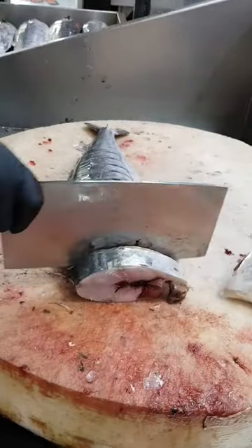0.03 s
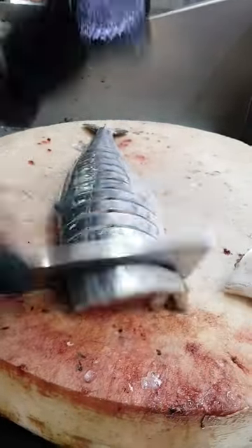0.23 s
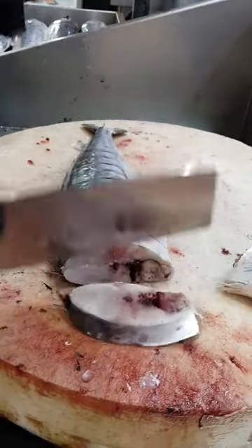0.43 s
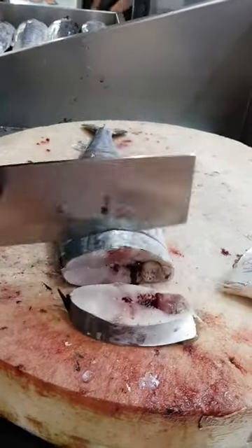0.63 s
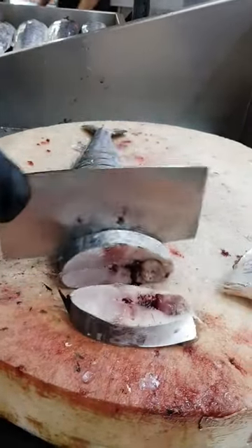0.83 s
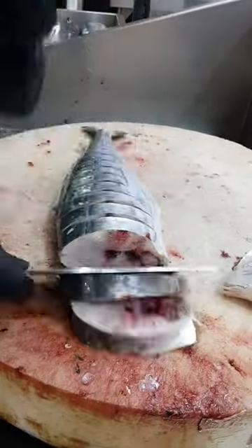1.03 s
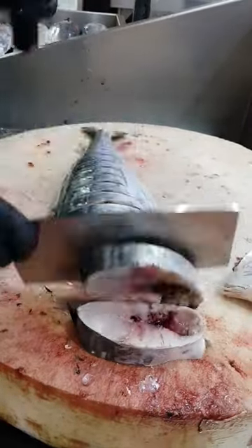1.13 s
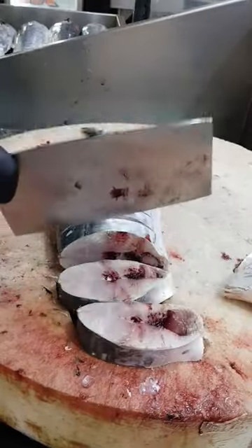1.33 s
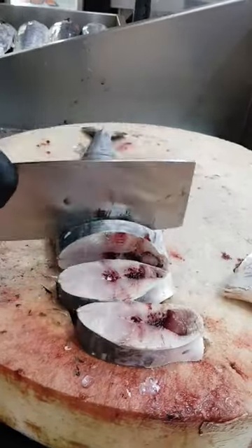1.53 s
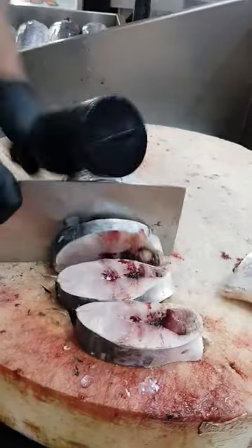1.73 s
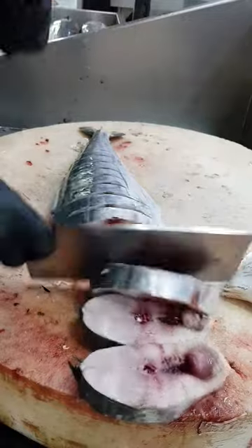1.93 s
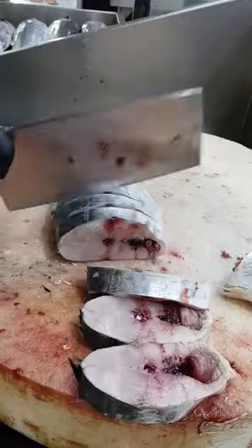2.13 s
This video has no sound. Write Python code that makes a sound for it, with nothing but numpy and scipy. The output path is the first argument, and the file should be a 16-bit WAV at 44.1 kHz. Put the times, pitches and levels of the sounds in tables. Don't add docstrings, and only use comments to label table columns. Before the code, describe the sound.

Close to a steel table in a humming hall, a mallet drives a cleaver through fish three times, woody and clanging, with deep thumps; slices slide softly between blows, and the right side is muffled.

```python
import sys
import numpy as np
from scipy import signal
from scipy.fft import rfft, irfft, next_fast_len
from scipy.io import wavfile
from scipy.ndimage import uniform_filter1d

SR = 44100
rng = np.random.default_rng(int(sys.argv[2]) if len(sys.argv) > 2 else 0)


def ratio(d):
    e = np.asarray(d, float) / 20
    return 10 ** e


def unload_audio(sound):
    columns = np.transpose(np.atleast_2d(sound))
    steps = np.round(np.clip(columns, -1, 1) * 32767)
    wavfile.write(sys.argv[1], SR, steps.astype(np.int16))


N = 97020

# pitch_hz, level_db (per Hz)
HALL_SPECTRUM = [(25, -13), (100, -5.5), (270, -11.5), (700, -14), (3800, -22.5), (6500, -35),
                 (11000, -29.5), (15400, -38.5)]
# pitch_hz, width_hz, level_db
HALL_HUMPS = [(108, 40, 10), (210.6, 37, 12)]
# time_s, level_db
HALL_ACTIVITY = [(0, 1.5), (.25, 4.5), (.45, -1), (.7, -1.5), (1.0, 1), (1.3, -1), (1.6, -0.5), (1.9, -1),
                 (2.2, 0)]
# pitch_hz, level_db
MOTOR_LINES = [(590, -77), (785, -105), (1174, -76), (1567, -80.5), (1760, -78.5), (2353, -83.5),
               (2552, -81.5)]
# pitch_hz, likeness (-1 to 1)
PORT_LIKENESS = [(60, 1), (180, 1), (550, 0.68), (1650, -0.038), (4970, -0.11), (15000, 0.12)]
# pitch_hz, level_db (per Hz)
WET_SPECTRUM = [(1500, -40), (3500, 5.5), (6500, -0.5), (10000, 5.5), (15000, -4.5)]
# start_s, length_s, level_db
RUSTLES = [
    (0.621, 0.38, -59),
    (1.121, 0.25, -54.5),
    (1.484, 0.11, -57),
    (1.548, 0.083, -53.5),
    (1.682, 0.14, -54.5),
    (1.851, 0.29, -54.5),
    (0.045, .15, -63),
]
# start_s, level_db, pitch_hz
TICKS = [
    (.111, -50, 11500),
    (.79, -54, 12000),
    (1.400, -38, 3750),
    (1.9, -53, 13000),
]
# mallet_s, blow_db, travel_to_wood_s, landing_db, touch_hiss_db
BLOWS = [
    (0.2467, -3, .0162, -5.5, -27.5),
    (.985, -1, .030, -7, -39),
    (1.8206, -1.5, .031, -11.5, -41.5),
]
# pitch_hz, level_db (per Hz)
KNOCK_SPECTRUM = [(150, -8), (400, -9.5), (1000, -10.5), (2000, -17.5), (4000, -28.5), (7000, -51.5),
                  (10000, -53), (15500, -62)]
# pitch_hz, t60_s
KNOCK_DECAY = [(200, 0.66), (500, 0.32), (1000, 0.29), (2000, 0.29), (4000, 0.2), (8000, 0.6),
               (15000, 0.24)]
# pitch_hz, level_db, t60_s
BLADE_MODES = [(890.7, -16.5, 0.42), (957, -38, 0.15), (1015.9, -1.5, 0.43), (1613, -13.5, 0.093),
               (1798, -28.5, .15), (2266, -31.5, 0.14), (2840, -37, 0.039), (3880, -39.5, 0.11)]
# pitch_hz, level_db (over the touch), t60_s
BONE_SNAP_MODES = [(2910, 9.5, 0.027), (1753, 11, 0.025), (4290, -3, 0.019), (5330, -6.5, 0.0067),
                   (9300, -9.5, 0.0099), (13500, -10, 0.016)]
# pitch_hz, level_db, t60_s
BLOCK_MODES = [(479, -19.5, 0.28), (531.7, -17, 0.32), (620.6, -21.5, 0.46), (668, -22, 0.28),
               (914, -30.5, 0.54), (1022, -24, 0.48), (1607, -24, 0.28), (1662, -32.5, 0.28),
               (1763, -36, 0.26), (2070, -33, 0.2), (2231, -28, 0.21), (3127, -35, 0.2), (4025, -43, 0.23)]
# pitch_hz, level_db, t60_s
TABLE_MODES = [(63.7, -4.5, 0.16), (78.8, -14.5, 0.26), (94.93, -1, 0.36), (100.9, -20.5, 0.86),
               (144.3, -5, 0.28), (166.2, -5.5, 0.19), (223.1, -8.5, 0.268), (259.6, -14, 0.15),
               (314, -15.5, 0.21), (399, -15.5, 0.19)]
# pitch_hz, level_db
LEFT_OVER_RIGHT = [(60, 13.5), (130, 13), (290, 9), (640, 14.5), (1410, 10.5), (3100, 11), (6820, 11),
                   (15000, 4)]

BOOM_RISE_S, PUSH_S = 0.0053, 0.00462
KNOCK_DB = -19


def read(points, hz):
    f, value = np.transpose(points)
    return np.interp(np.log(hz + 1), np.log(f + 1), value)


def evened(x):
    return x / np.sqrt(np.mean(x ** 2) + 1e-20)


def add(mix, s, sound):
    part = mix[:, round(s * SR):][:, :sound.shape[1]]
    part += sound[:, :part.shape[1]]


def noise(length, size, field_db):
    hop = size // 4
    hz = np.fft.rfftfreq(size, 1 / SR)[:, None]
    t = np.arange(length // hop + 5) * hop / SR
    a, b, c, d = rng.standard_normal((len(t), len(hz), 4)).T
    left, other = a + 1j * b, c + 1j * d
    same = np.clip(read(PORT_LIKENESS, hz), -1, 1)
    ports = np.array([left, same * left + np.sqrt(1 - same ** 2) * other])
    sound = signal.istft(ports * ratio(field_db(hz, t)), nperseg=size, noverlap=size - hop)[1]
    return sound[:, :length]


def wobble(length, width):
    rough = rng.standard_normal((2, length))
    return evened(uniform_filter1d(uniform_filter1d(rough, width), width))


def patches(hz, t, bins, frames):
    rough = rng.standard_normal((len(t), len(hz))).T
    return evened(uniform_filter1d(uniform_filter1d(rough, bins, 0), frames, 1))


def ring(modes, t, fuzz, spread):
    out = np.zeros((2, len(t)))
    for hz, db, t60 in modes:
        port_shift = spread * rng.standard_normal() * np.array([[0], [1]])
        phase = 2 * np.pi * rng.random() + port_shift
        flutter = 1 + fuzz * wobble(len(t), 160)
        out += ratio(db - 60 * t / t60) * flutter * np.sin(2 * np.pi * hz * t + phase)
    return out


def hall():
    def field(hz, t):
        humps = sum(db * np.exp(-((hz - f) / w) ** 2) for f, w, db in HALL_HUMPS)
        swell_db = -0.5 * wobble(len(t), 12)[0]
        activity_db = np.interp(t - 1024 / SR, *np.transpose(HALL_ACTIVITY))
        return read(HALL_SPECTRUM, hz) + humps + 2.0 * patches(hz, t, 8, 8) + swell_db + activity_db

    t = np.arange(N) / SR
    wash = ratio(-44) * evened(noise(N, 2048, field))
    for hz, db in MOTOR_LINES:
        level = ratio(db + 16 + 2.1 * wobble(N, 3000))
        wash += level * np.sin(2 * np.pi * (hz * t + rng.random((2, 1))))
    return wash


def wet_hiss(length, tilt_db=0):
    def field(hz, t):
        return read(WET_SPECTRUM, hz) + tilt_db * np.log2(hz / 8000 + .01) + 0 * t
    return evened(noise(length, 256, field))


def rustles(mix):
    for s, length, db in RUSTLES:
        t = np.arange(0, length, 1 / SR)
        hiss = wet_hiss(len(t))
        swell = np.sin(np.pi * np.sqrt(t / length)) ** 2
        add(mix, s, ratio(db + 2.3 * wobble(len(t), 200)[0]) * swell * hiss)


def ticks(mix):
    t = np.arange(600) / SR
    for s, db, hz in TICKS:
        spit_db = -47 + (db + 38) / 2
        add(mix, s, ratio(spit_db - 60 * t / .014) * wet_hiss(len(t)))
        cluster = [(hz, db, .03), (hz * 1.06, db - 3, .02), (hz * .92, db - 3, .02)]
        add(mix, s, ring(cluster, t, .3, 2.0) * np.minimum(t / .001, 1))


def knock(t):
    def field(hz, s):
        decay_db = 60 * s / read(KNOCK_DECAY, hz)
        return read(KNOCK_SPECTRUM, hz) - decay_db + 3 * patches(hz, s, 3, 6)

    tail = noise(len(t), 256, field)
    start_rms = np.sqrt(np.mean(tail[:, :800] ** 2))
    return np.minimum(t / 0.00088, 1) * tail / start_rms


def first_touch(t, travel_s, touch_db):
    slice_db, slice_t60_s, slice_hold_s = -47.5, 0.18, 0.017
    hiss = wet_hiss(len(t), tilt_db=3.5)
    contact = ratio(touch_db - 60 * t / 0.044)
    after_s = np.maximum(t - travel_s - slice_hold_s, 0)
    slicing = ratio(slice_db - 60 * after_s / slice_t60_s)
    light_knock = ratio(touch_db + 9.5 - 60 * t / .07) * knock(t)
    return (contact + slicing) * hiss * np.minimum(t / 0.0019, 1) + light_knock


def blade(t, travel_s, blow_db, touch_db):
    damp_db, damp_s, rise_s = -23, .02, .0022
    landed = 1 - np.exp(-np.maximum(t - travel_s, 0) / damp_s)
    envelope = ratio(damp_db * landed) * np.minimum(t / rise_s, 1)
    steel = ratio(blow_db) * envelope * ring(BLADE_MODES, t, .2, 0.53)
    return steel + ratio(touch_db) * ring(BONE_SNAP_MODES, t, 0.59, 2.12)


def block(t, blow_db):
    wood = (1 - np.exp(-t / 0.0025)) * ring(BLOCK_MODES, t, .45, 2.65)
    return ratio(blow_db) * (ratio(KNOCK_DB) * knock(t) + wood)


def early_boom(t, land_db):
    early_db = -8.5
    return ratio(land_db + early_db) * (1 - np.exp(-t / BOOM_RISE_S)) * ring(TABLE_MODES, t, 0.033, 0.033)


def boom(t):
    both = 0
    for hz, db, t60 in TABLE_MODES:
        both = both + ratio(db - 60 * t / t60) * np.sin(2 * np.pi * hz * (t - PUSH_S / 2))
    flutter = 1 + 0.23 * wobble(len(t), 900)[[0, 0]]
    return (1 - np.exp(-t / BOOM_RISE_S)) * flutter * both


def landing(t, blow_db, land_db):
    push = ratio(blow_db - 3) * np.sin(np.pi * np.minimum(t / PUSH_S, 1))
    soft = 1 - np.exp(-t / .004)
    return push + ratio(land_db) * (boom(t) + ratio(KNOCK_DB - 11.5) * soft * knock(t))


def rebound(t, land_db):
    back = np.sin(np.pi * np.minimum(t / 0.0051, 1)) ** 2
    return -ratio(land_db - 4.5) * (back + 0.3 * boom(t))


def chop(mix, s, blow_db, travel_s, land_db, touch_db):
    touch_lead_s, rebound_s = 0.0053, 0.028
    t = np.arange(SR // 2) / SR
    add(mix, s - touch_lead_s, first_touch(t, travel_s, touch_db))
    add(mix, s, blade(t, travel_s, blow_db, touch_db))
    add(mix, s, block(t, blow_db))
    add(mix, s, early_boom(t, land_db))
    add(mix, s + travel_s, landing(t, blow_db, land_db))
    add(mix, s + travel_s + rebound_s, rebound(t, land_db))


def scene():
    mix = hall()
    rustles(mix)
    ticks(mix)
    for blow in BLOWS:
        chop(mix, *blow)
    return mix


def top_cut(x):
    return signal.sosfilt(signal.butter(12, 16500, fs=SR, output="sos"), x)


def record(dry):
    low_edge_hz, high_edge_hz = 42, 15250
    limit_db, recover_db_per_s, squeeze = -6, 68, .7
    size = next_fast_len(N + 4096)
    hz = np.fft.rfftfreq(size, 1 / SR)
    dry = signal.sosfilt(signal.butter(2, low_edge_hz, 'highpass', fs=SR, output='sos'), dry)
    treble_edge = np.clip((high_edge_hz + 500 - hz) / 1000, 0, 1)
    left, right = irfft(rfft(dry, size) * treble_edge, size)[:, :N]
    right = irfft(rfft(right, size) * ratio(-read(LEFT_OVER_RIGHT, hz)), size)[:N]
    power_db = 10 * np.log10(abs(uniform_filter1d(left ** 2, size=100)) + 1e-12)
    fall = np.arange(N) * recover_db_per_s / SR
    peak_db = np.maximum.accumulate(power_db + fall) - fall
    over_db = np.maximum(peak_db - limit_db, 0)
    held = np.array([left, right]) / ratio(squeeze * uniform_filter1d(over_db, size=200))
    return top_cut(np.clip(held, -1, 1))


dry = scene()
out = record(dry)
unload_audio(out)
```